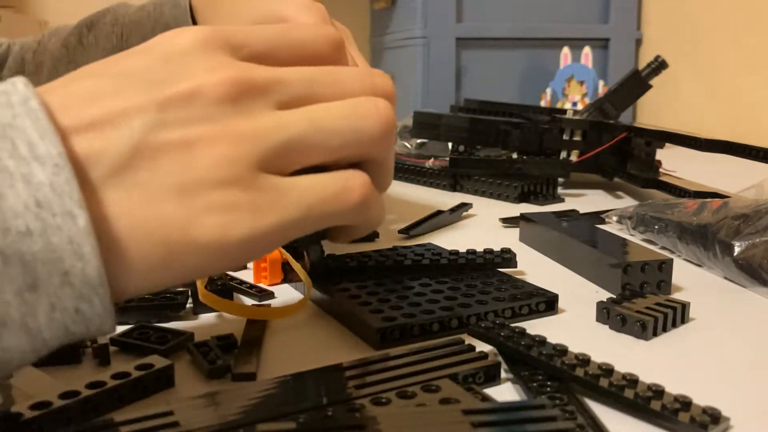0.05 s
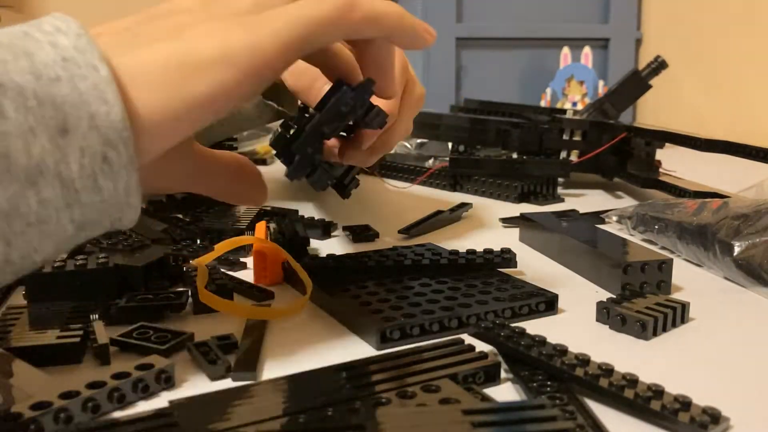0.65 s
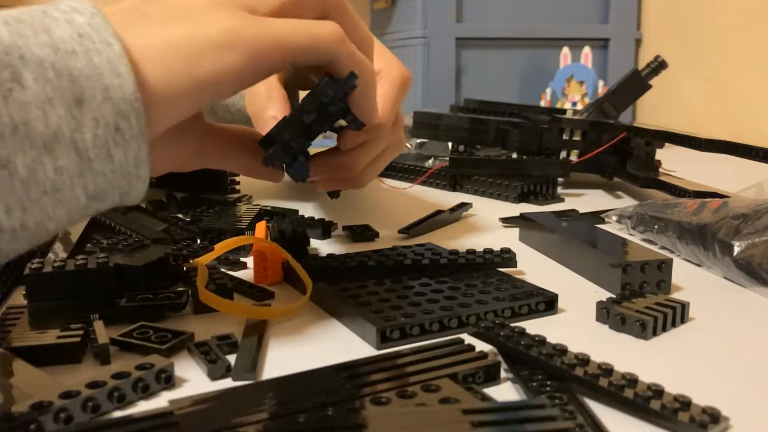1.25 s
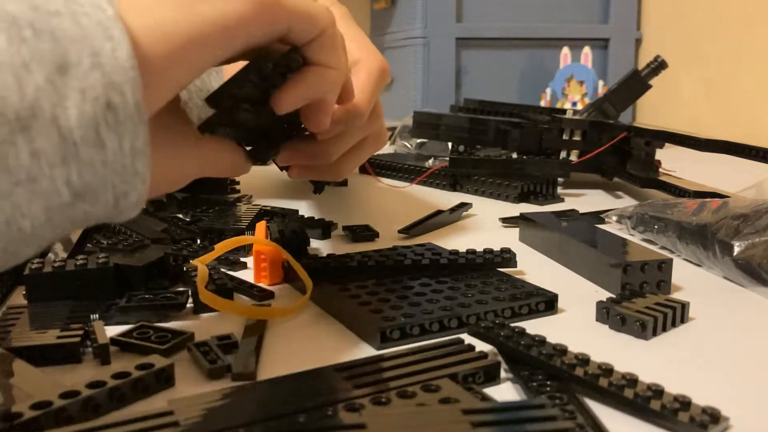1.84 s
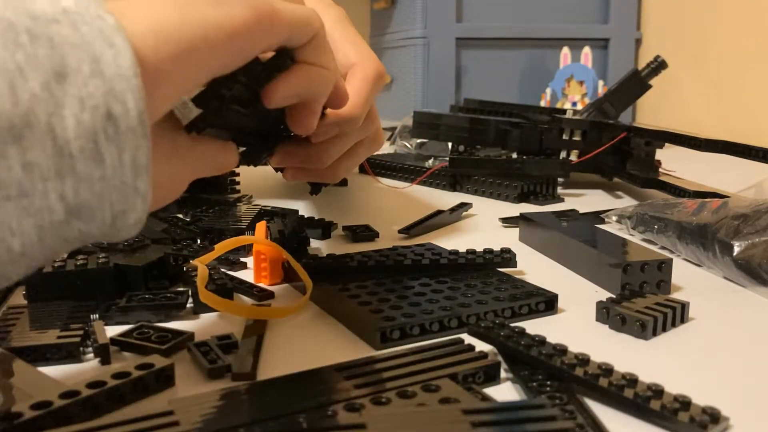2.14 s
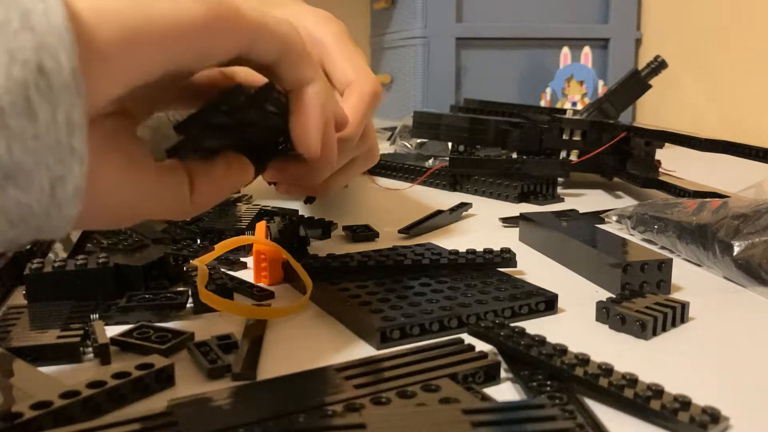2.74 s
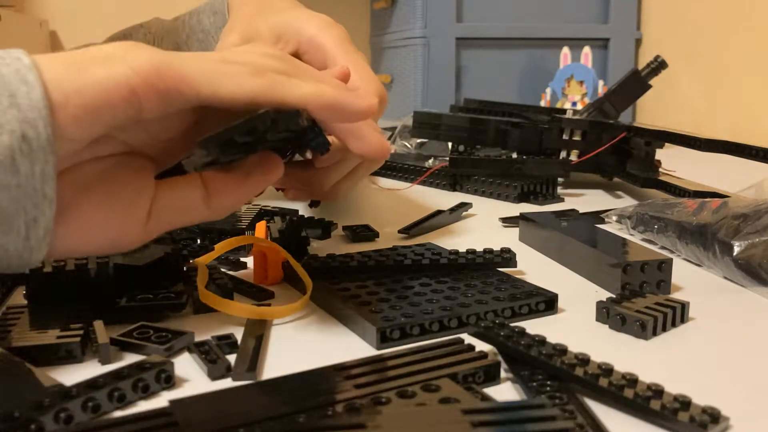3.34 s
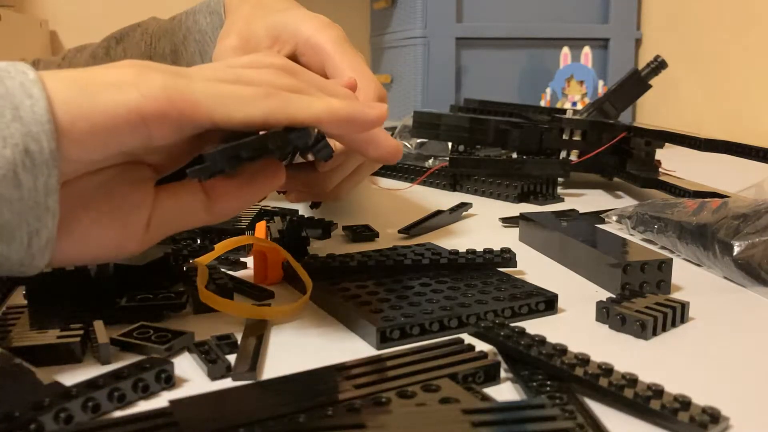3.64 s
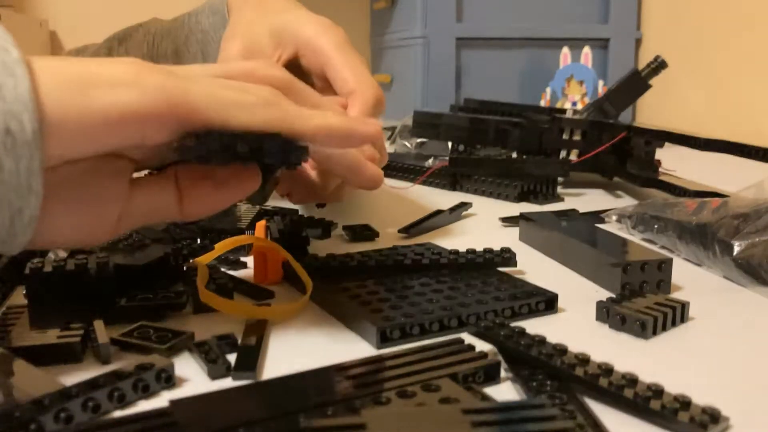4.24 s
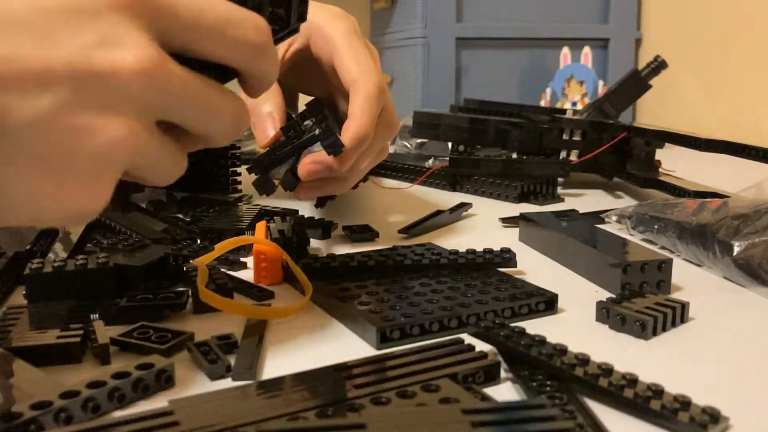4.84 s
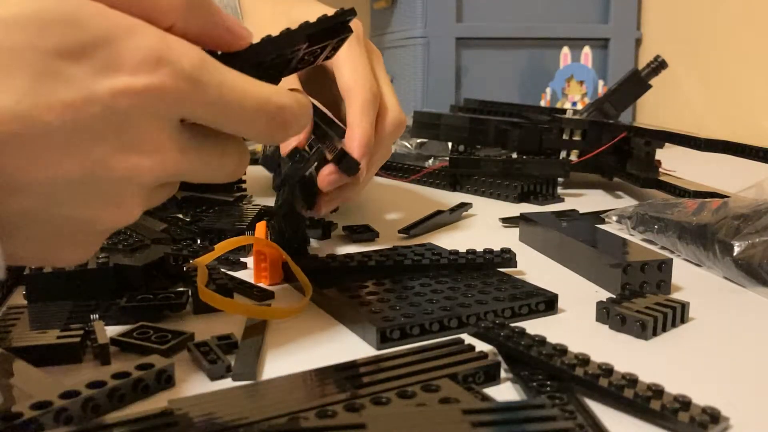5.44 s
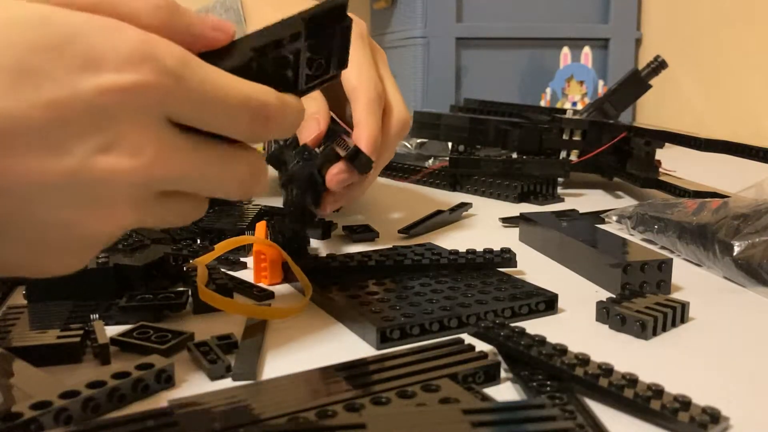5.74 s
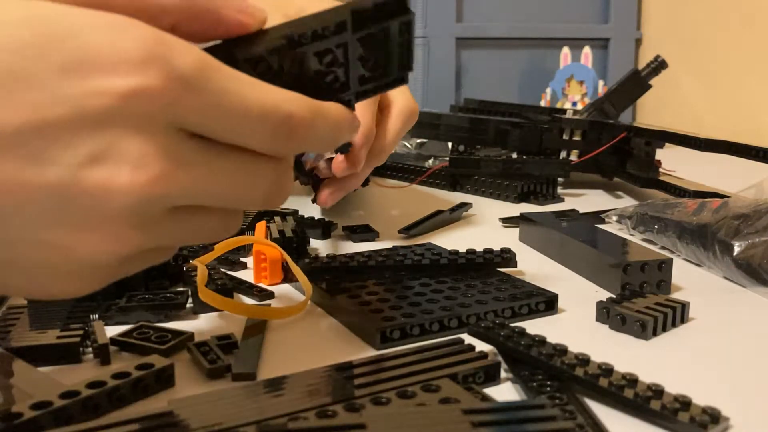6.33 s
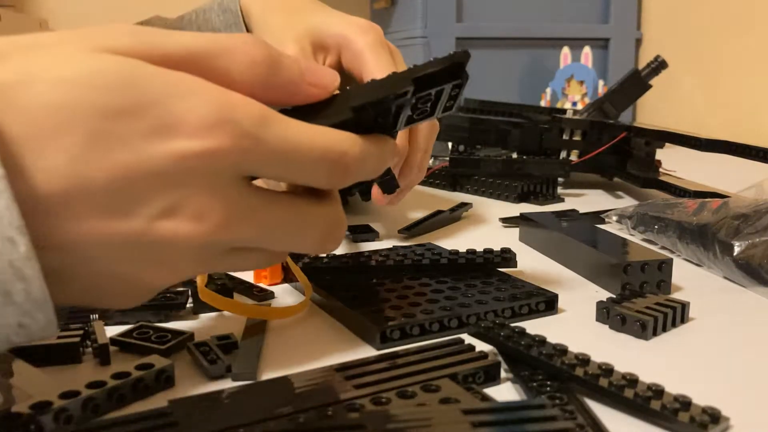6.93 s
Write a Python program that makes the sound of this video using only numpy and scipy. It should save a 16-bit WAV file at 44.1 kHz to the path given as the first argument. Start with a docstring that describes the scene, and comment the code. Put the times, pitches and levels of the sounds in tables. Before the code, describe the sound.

Hollow plastic building bricks are handled over a desk, close to the microphone in a small, quiet room. For the first two seconds they click and knock irregularly, with a sharper clack at about 0.6 seconds, while fingers slide, a sleeve rustles and the desk bumps softly. At about 2.2 seconds two plates start to be prised apart with a quick run of thin, bright ticks. After a pause, the ticking returns from 3.2 seconds as an uneven creak. At 4.1 seconds the pieces let go with one loud, sharp snap, followed at once by low thuds of hands on the desk and a few quick clicks. Lighter clicks come around 4.7 seconds. From about 5.1 to 5.8 seconds there are soft scrapes, very faint squeaks and dull bumps. A few more brief scrapes and soft bumps follow near 6.4 and 6.7 seconds.

```python
"""Small plastic bricks are handled over a desk in a small room, close to a phone's two microphones.
At first the hollow bricks click and knock, while fingers slide, a sleeve rustles and the desk thuds.
From 2.2 s two plates are prised apart: by stick-slip friction their studs tick, pause, then creak.
At 4.1 s the last stud lets go with a loud snap, and the dropping hands excite the desk's low modes.
A few clicks, scrapes, faint squeaks and soft bumps follow."""
import sys
import numpy as np
from scipy import signal
from scipy.fft import rfft, irfft, next_fast_len
from scipy.io import wavfile
from scipy.ndimage import map_coordinates

SR = 44100
rng = np.random.default_rng(int(sys.argv[2]) if len(sys.argv) > 2 else 0)


def int16_out(signal):
    """Quantize to a 16-bit WAV file."""
    q = np.round(np.clip(np.atleast_2d(signal).T, -1, 1) * 32767)
    wavfile.write(sys.argv[1], SR, q.astype(np.int16))


N = 316638
TIME = np.arange(N) / SR
USUAL_DB = -35  # reference strength of a contact; all tabulated levels are relative

# reverberation time of the room: f/Hz, t60/s
ROOM_DECAY = [(100, 0.28), (500, 0.28), (2000, 0.19), (6000, 0.33), (15000, 0.28)]
# likeness of left and right in a diffuse field: f/Hz, coherence (0-1)
COHERENCE = [(100, 1), (300, 0.8), (700, 0.09), (3000, 0.23), (5000, 0.067), (8000, 0.66)]
# phase by which the left microphone leads: f/Hz, phase/rad
PHASE_LEAD = [(0, 0), (1000, .3), (2000, -.3), (3000, -1.4), (4300, -.8), (5000, -1.7), (6000, -3.1),
              (6800, -2.4), (9800, 3.14), (13100, 9.42), (16500, 15.3)]
# spectra of reverberation, room air, resting arms, sliding skin and cloth: f/Hz, level/dB
ROOM_SPECTRUM = [(60, 1.5), (250, -2), (1500, 3), (4000, 1), (7000, -2), (15000, -11)]
AIR_SPECTRUM = [(20, -10.5), (60, -4.5), (120, -17), (250, -13), (600, -18.5), (2000, -23), (6000, -32),
                (8000, -29), (15000, -32), (16500, -36)]
ARM_SPECTRUM = [(20, -39), (35, -20.5), (50, -4), (70, 3.5), (115, 0.5), (180, -11), (350, -15.5),
                (800, -34.5), (2000, -75.5)]
SKIN_SPECTRUM = [(600, -15), (2500, -18), (4400, 0.5), (6000, -9), (8000, 2), (12000, 3), (15000, 3.5),
                 (16500, -6.5)]
CLOTH_SPECTRUM = [(60, -5), (130, 10), (300, 3), (600, -2), (1000, -12.5), (2000, -6.5), (4000, -10.5),
                  (8000, -6), (15000, -8)]
# spectra of slipping plastic and of a struck shell: f/Hz, level/dB
SNAP_SPECTRUM = [(1500, -36.5), (3000, -16), (5500, -5), (7600, -2.5), (10500, -1), (14500, -2),
                 (16500, -12)]
SHELL_SPECTRUM = [(250, -17.5), (600, -1), (1500, -4.5), (2500, 0.5), (4000, -5), (6500, -8.5),
                  (12000, -44.5)]
# resonances of a scrape and of a stud: f/Hz, bandwidth/Hz, level/dB
SCRAPE_PEAKS = [(1530, 2200, -4), (3040, 210, 5), (7700, 1500, -38)]
STUD_PEAKS = [(4250, 1300, -3), (7530, 220, -2), (10550, 830, -10.5), (14000, 370, -4)]
# modes of the desk top and of a hollow brick: f/Hz, level/dB, t60/s
DESK_MODES = [(55, -4.5, 0.69), (64, -8, 0.7), (88.7, -1.5, 0.34), (106.2, 5, 0.23), (127, 7.5, 0.11),
              (156, 2, 0.13), (234, -3, 0.21), (251.4, -4, 0.16), (294, -7, 0.22), (345.4, -3.5, 0.091),
              (438, -11, 0.052), (656, -12, .06), (780, -9, 0.028), (930, -9, 0.052)]
BRICK_MODES = [(738, -4, 0.017), (990, -4.5, 0.022), (1080, -6.5, 0.03), (1350, -3, 0.02), (1394, -1, 0.04),
               (1700, 6, .025), (1864, 1.5, 0.036), (2430, -4, 0.023), (2850, -1.5, .02),
               (3025, -3.5, 0.054), (4130, -13.5, .02)]
# modes of the hollow assembly: ratio to the main ring, level/dB, t60/s
ASSEMBLY_MODES = [(0.798, -7, .025), (.9, 0.5, .025), (1.018, 4.5, .022), (1.12, -1, .025),
                  (1.9, -10.5, 0.046), (2.039, -11, 0.025), (2.16, -8, .035)]
# fingertips sliding on plastic: t/s, level/dB, duration/s
FINGER_SLIDES = [(1.036, -67.5, 0.094), (2.325, -66.5, 0.059), (2.616, -71, 0.062), (2.964, -78.5, 0.2),
                 (4.248, -48, 0.057), (4.583, -64.5, 0.077), (4.713, -69.5, 0.24), (5.813, -69.5, 0.1),
                 (6.905, -76.5, 0.079)]
# sleeve and held parts scraping the desk: strongest pull t/s, level/dB, duration/s, cutoff f/Hz
DESK_SCRAPES = [(0.005, -61.5, 0.046, 3500), (0.29, -62, 0.077, 1600), (0.407, -66.5, 0.11, 1400),
                (0.81, -66.5, .055, 4530), (1.023, -64.5, 0.085, 1620), (1.63, -68.5, 0.054, 8100),
                (2.674, -66, 0.069, 2920), (5.127, -72.5, 0.21, 700), (5.336, -69, 0.033, 3230),
                (5.402, -66, 0.04, 3040), (5.47, -61, 0.25, 728), (5.476, -64, 0.1, 2930),
                (5.586, -58.5, 0.036, 5770), (5.802, -68.5, 0.084, 3500), (6.38, -65.5, 0.042, 3674),
                (6.664, -56, 0.021, 3980), (6.716, -61.5, 0.04, 3800)]
# plastic singing under a rub: t/s, duration/s, f/Hz, level/dB, waver as a share of f
RUB_SQUEAKS = [(0.407, 0.11, 1805, -59.5, 0.012), (5.415, 0.25, 7940, -76.5, 0.061),
               (5.438, 0.079, 3050, -73, 0.025)]
# soft blows of hands and forearms on the desk: t/s, level/dB, centre of the push f/Hz
DESK_BUMPS = [(0.172, -46.5, 313), (0.252, -36, 400), (0.372, -44, 546), (0.498, -41, 294),
              (0.533, -37.5, 380), (1.02, -50.5, 160), (1.177, -31.5, 193), (1.843, -43.5, 162),
              (2.121, -41.5, 219), (2.256, -48.5, 163), (3.108, -37, 141), (4.014, -36, 125),
              (4.109, -21, 480.7), (4.129, -12.5, 231), (4.140, -14.5, 131), (4.161, -12.5, 80.6),
              (4.23, -17.5, 147), (4.285, -28, 96), (4.372, -31.5, 130), (5.118, -38, 122),
              (5.355, -35, 113), (5.399, -30, 129.8), (5.454, -26.5, 100), (6.02, -45, 82.6),
              (6.396, -43, 129), (6.738, -34.5, 196), (6.764, -32.5, 110)]
# knocks on the assembly: t/s, level/dB, main ring f/Hz (lower for a larger piece)
ASSEMBLY_KNOCKS = [(0.252, -44, 1510), (0.531, -51.5, 1680), (0.632, -33, 1620), (0.641, -39, 1653),
                   (4.1075, -23, 1456), (4.225, -41.5, 1870)]
# bricks meeting in the fingers: t/s, snap level/dB, shell level/dB, cover by the hand (0-1)
BRICK_CLICKS = [(0.205, -58, -65.5, 0.75), (0.251, -57, -43.5, 0.3), (0.372, -75, -57, 0.3),
                (0.487, -44.5, -54, 0.55), (0.532, -55, -55, 0.8), (0.631, -32.5, -34.5, 0.84),
                (0.793, -48, -47, 0.9), (0.832, -57, -48, 0), (0.999, -53, -54, 0.6),
                (1.258, -47.5, -54.5, 0.95), (1.403, -58, -58, 0.7), (1.531, -42.5, -53, 0.74),
                (1.547, -39, -50, .6), (1.611, -35.5, -48.5, 0.81), (1.831, -45, -52.5, 1),
                (1.904, -47, -52.5, 0.06), (2.119, -48, -53, 0.37), (3.098, -51, -50, 0),
                (4.107, -16.5, -17.5, .3), (4.186, -29.5, -33.5, 0.3), (4.224, -37, -33.5, 0.52),
                (4.264, -35, -35, 0), (4.678, -46.5, -49, 0), (4.703, -41, -49, 0), (4.769, -50, -55.5, 0)]
# studs slipping in their sockets, the last one letting go: t/s, level/dB, resonance f/Hz
STUD_SLIPS = [(2.17, -44.5, 8200), (2.193, -39, 10600), (2.208, -33, 15100), (2.242, -37.5, 14300),
              (2.27, -33.5, 11700), (2.289, -30, 8260), (2.313, -37, 8700), (2.362, -40, 8040),
              (3.199, -44, 8200), (3.221, -39.5, 7800), (3.242, -37.5, 12400), (3.25, -38, 8700),
              (3.298, -30, 5850), (3.34, -35.5, 10700), (3.354, -35, 7800), (3.424, -40, 8050),
              (3.436, -33, 14300), (3.51, -42.5, 8550), (3.524, -41, 8500), (3.537, -35, 7550),
              (3.542, -40, 14700), (3.594, -43, 7750), (3.606, -35.5, 7540), (3.625, -40.5, 7800),
              (3.69, -33, 7760), (3.709, -39, 7600), (3.785, -33.5, 7750), (3.804, -29.5, 7600),
              (3.892, -31, 14200), (3.944, -36, 11700), (4.027, -29.5, 11500), (4.054, -40, 11300),
              (4.073, -31, 7600), (4.096, -30.5, 7600), (4.104, -12.5, 11300)]


def amp(db):
    """Amplitude ratio of a level in decibels."""
    return 10 ** (np.asarray(db) / 20)


def unit_rms(x):
    """Power normalisation to rms 1."""
    return x / np.sqrt(np.mean(x ** 2) + 1e-20)


def unit_energy(x):
    """Energy normalisation to one millisecond at rms 1."""
    return x * np.sqrt(SR / 1000 / (np.sum(x ** 2) + 1e-20))


def along(points, hz):
    """Interpolation of (f/Hz, value) points on a logarithmic frequency axis."""
    f, values = np.transpose(points)
    return np.interp(np.log(hz + 1), np.log(f + 1), values)


def wobble(rate):
    """Random modulation: a spline through `rate` knots a second."""
    return map_coordinates(rng.standard_normal(int(N * rate / SR) + 4), [TIME * rate])


def add(track, s, x):
    """Superposition of x on the track at time s."""
    part = track[..., max(round(s * SR), 0):][..., :x.shape[-1]]
    part += x[..., :part.shape[-1]]


def noise(spectrum, size, resonances=()):
    """Random-phase noise of rms 1: a broad spectrum with Lorentzian resonance peaks."""
    hz = np.fft.rfftfreq(size, 1 / SR)
    peaks = 1 + sum(amp(db) / (1 + ((hz - f) / (width / 2)) ** 2) for f, width, db in resonances)
    phases = np.exp(2j * np.pi * rng.random(len(hz)))
    return unit_rms(irfft(amp(along(spectrum, hz)) * peaks * phases, size))


def ringing(modes, t, scatter_db):
    """Free vibration: a sum of damped modes, excited at new strengths each time."""
    hz, db, t60 = np.transpose(modes)[:, :, None]
    decays = amp(db + scatter_db * rng.standard_normal(hz.shape) - 60 * t / t60)
    sines = np.sin(2 * np.pi * (hz * t + rng.random(hz.shape)))
    return unit_energy(np.sum(decays * sines, axis=0))


def diffuse(spectrum, size):
    """Diffuse field: noise from all sides is only partly coherent at two points."""
    padded = next_fast_len(size, True)
    angle = np.arccos(np.clip(along(COHERENCE, np.fft.rfftfreq(padded, 1 / SR)), 0, 1)) / 2
    pair = rfft([noise(spectrum, padded), noise(spectrum, padded)])
    mid, side = irfft(pair * [np.cos(angle), np.sin(angle)], padded)[:, :size]
    return np.array([mid + side, mid - side])


def room(x, build_s=0.0032):
    """Reverberation: convolution with an exponentially decaying tail, different for every spot."""
    hz, t, bands = signal.stft(diffuse(ROOM_SPECTRUM, size=16384), SR, nperseg=256)
    envelope = amp(-60 * t / along(ROOM_DECAY, hz)[:, None]) * (1 - np.exp(-t / build_s))
    tail = signal.istft(bands * envelope, SR, nperseg=256)[1]
    return signal.fftconvolve(x[None], tail / np.linalg.norm(tail[0]), axes=1)


def add_in_room(track, s, x, room_db):
    """Superposition of direct and reverberant sound at time s."""
    add(track, s, x)
    add(track, s, amp(room_db) * room(x))


def room_air(level_db=-76):
    """Ambient noise: a steady, quiet diffuse field."""
    return amp(level_db) * diffuse(AIR_SPECTRUM, N)


def forearms(rest_db=-73, settle_db=-62, settle_growth=0.28, settle_s=0.054, drag_s=0.043, lag_s=0.017):
    """Forced vibration: resting arms make the desk rumble, more as weight shifts at bumps and scrapes."""
    swells = [(s + settle_s, settle_db + settle_growth * (db - USUAL_DB), settle_s)
              for s, db, _ in DESK_BUMPS]
    swells += [(s + lag_s, db + 1, drag_s) for s, db, _, _ in DESK_SCRAPES]
    rest_power = amp(rest_db + 1.5 * wobble(12)) ** 2
    swell_power = sum(amp(db) ** 2 * np.exp(-((TIME - s) / width) ** 2) for s, db, width in swells)
    rumble = unit_rms(diffuse(ARM_SPECTRUM, N) * amp(3 * wobble(36)))
    return np.sqrt(rest_power + swell_power) * rumble


def fingers(level_db=-1, grain_db=4):
    """Friction noise: skin sliding over the studs gives short, grainy hisses."""
    strokes = sum(amp(db) * np.exp(-(2 * (TIME - s) / length) ** 4) for s, db, length in FINGER_SLIDES)
    hiss = unit_rms(diffuse(SKIN_SPECTRUM, N) * amp(grain_db * wobble(400)))
    return amp(level_db) * strokes * hiss


def scrapes(level_db=1, grain_db=7, grain_hz=300, rise_share=0.51):
    """Sliding friction: a run of tiny catches swells and fades, brighter for a harder edge."""
    out, t = np.zeros((2, N)), np.arange(-8192, 8192) / SR
    for s, db, length, top_hz in DESK_SCRAPES:
        rise, fall = rise_share * length, (1 - rise_share) * length
        colour = [(hz, cloth_db - 10 * np.log10(1 + (hz / top_hz) ** 6))
                  for hz, cloth_db in CLOTH_SPECTRUM]
        catches = amp(grain_db * np.interp(t * grain_hz, np.arange(-200, 200), rng.standard_normal(400)))
        pull = np.exp(-np.where(t < 0, (t / rise) ** 2, np.abs(t / fall) ** 1.4))
        rub = amp(db + level_db) * pull * unit_rms(noise(colour, len(t), SCRAPE_PEAKS) * catches)
        before_zero = max(round(-(s + t[0]) * SR), 0)
        add_in_room(out, s + t[0], rub[before_zero:], room_db=-3)
    return out


def squeaks(waver_hz=270):
    """Self-excited oscillation: rubbed plastic sings briefly on one wavering note."""
    out = np.zeros((2, N))
    for start, length, pitch_hz, db, waver in RUB_SQUEAKS:
        t = np.arange(int(length * SR)) / SR
        pitch = pitch_hz * (1 + waver * wobble(waver_hz)[:len(t)])
        note = amp(db) * np.sin(np.pi * t / length) * np.sin(2 * np.pi * np.cumsum(pitch) / SR)
        add_in_room(out, start, note, room_db=-5)
    return out


def bumps(rise_cycles=1.2, octaves=0.62, push_db=-1, push_t60=0.055, nudge_db=-38.5, nudge_growth=0.64):
    """Resonance: a soft blow, or the nudge of a click, rings the desk modes near its push frequency."""
    out, t = np.zeros((2, N)), np.arange(16384) / SR
    nudges = [(s, nudge_db + nudge_growth * (shell_db - USUAL_DB), 280)  # push centred on 280 Hz
              for s, _, shell_db, _ in BRICK_CLICKS]
    for s, db, centre_hz in DESK_BUMPS + nudges:
        modes = [(hz, mode_db - 10 * np.log10(1 + (np.log2(hz / centre_hz) / octaves) ** 4), t60)
                 for hz, mode_db, t60 in DESK_MODES]
        colour = [(centre_hz / 6, -40), (centre_hz / 2, -5), (centre_hz * 1.7, 0),
                  (centre_hz * 5, -25), (centre_hz * 30, -70), (centre_hz * 100, -100)]
        push = amp(push_db) * unit_energy(noise(colour, len(t)) * amp(-60 * t / push_t60))
        onset = 1 - np.exp(-(t * centre_hz / rise_cycles) ** 2)
        thud = amp(db) * unit_energy((ringing(modes, t, scatter_db=1) + push) * onset)
        add_in_room(out, s, thud, room_db=-6)
    return out


def knocks(rise_s=0.00059):
    """Impact excitation: the hollow assembly rings in close modes, with weaker ones an octave up."""
    out, t = np.zeros((2, N)), np.arange(4096) / SR
    for s, db, main_hz in ASSEMBLY_KNOCKS:
        modes = [(ratio * main_hz, mode_db, t60) for ratio, mode_db, t60 in ASSEMBLY_MODES]
        clack = amp(db) * ringing(modes, t, scatter_db=2) * (1 - np.exp(-t / rise_s))
        add_in_room(out, s, clack, room_db=-2)
    return out


def contact(snap_db, shell_db, stud_hz, usual_slip_s, snap_room_db, shell_room_db, dull_db=0,
            hardening=0.36, tail_db=-25, tail_t60=0.066, crack_db=3, crack_t60=0.03):
    """Transient excitation: plastic slips in a bright burst; the hollow brick rings lower and longer."""
    t = np.arange(2048) / SR
    # a stronger contact is shorter and starts more sharply
    slip_s = usual_slip_s * amp(-hardening * (max(snap_db, shell_db) - USUAL_DB))
    onset = 1 - np.exp(-(t / (0.2 * slip_s)) ** 2)
    decay = amp(-60 * t / slip_s) + amp(tail_db - 60 * t / tail_t60)
    # a hand in the way takes off the top, by dull_db an octave
    colour = [(hz, db - dull_db * max(np.log2(hz / 7000), 0)) for hz, db in SNAP_SPECTRUM]
    peaks = STUD_PEAKS + [(stud_hz, 1200, 1.5)]  # each stud adds its own resonance
    brick_size = np.exp(0.07 * rng.standard_normal())
    snap = amp(snap_db) * unit_energy(noise(colour, len(t), peaks) * onset * decay)
    ring = ringing([(hz / brick_size, db, t60) for hz, db, t60 in BRICK_MODES], t, scatter_db=3)
    crack = amp(crack_db) * unit_energy(noise(SHELL_SPECTRUM, len(t)) * amp(-60 * t / crack_t60))
    shell = amp(shell_db) * unit_energy((ring + crack) * onset)
    out = room(amp(snap_room_db) * snap + amp(shell_room_db) * shell)
    add(out, 0, snap + shell * amp([[-1.5], [1.2]]))  # the shell sounds slightly to the right
    return out


def clicks(hollow_db=-2):
    """Acoustic shadowing: the more the hand covers meeting bricks, the duller and more reverberant."""
    out = np.zeros((2, N))
    for s, snap_db, shell_db, cover in BRICK_CLICKS:
        click = contact(snap_db, shell_db + hollow_db, stud_hz=rng.uniform(4000, 14000),
                        usual_slip_s=0.006, snap_room_db=-15 + 10 * cover,
                        shell_room_db=-5 + 6 * cover, dull_db=9 * cover)
        add(out, s, click)
    return out


def prising(hollow_db=-19, loosen_s=0.33, loosen_db=3.5, afterslip_s=(0.0097, 0.022), afterslip_db=-16.5):
    """Stick-slip: each stud slips, then again more weakly; the plates ring more freely near release."""
    out, release_s = np.zeros((2, N)), STUD_SLIPS[-1][0]
    for s, stud_db, stud_hz in STUD_SLIPS:
        looseness = np.clip(1 - (release_s - s) / loosen_s, 0, 1)
        for delay, drop_db in [(0, 0), (rng.uniform(*afterslip_s), afterslip_db)]:
            snap_db = stud_db + drop_db
            shell_db = snap_db + hollow_db + loosen_db * looseness
            tick = contact(snap_db, shell_db, stud_hz, usual_slip_s=0.0089,
                           snap_room_db=-12, shell_room_db=-3)
            add(out, s + delay, tick)
    return out


def scene(left_db=-0.7, right_db=2.25):
    """Superposition of all sources; the desk reaches the right microphone a little more."""
    desk = (forearms() + scrapes() + bumps() + knocks()) * amp([[left_db], [right_db]])
    return room_air() + fingers() + squeaks() + desk + clicks() + prising()


def record(dry, top_hz=16500):
    """Phase difference and band limit: the two microphones differ in phase and pass no extreme treble."""
    padded = next_fast_len(N + SR // 2, True)
    hz = np.fft.rfftfreq(padded, 1 / SR)
    lead = np.interp(hz, *np.transpose(PHASE_LEAD))
    phase_shift = np.exp(0.5j * np.array([lead, -lead]))
    low_pass = 1 / (1 + (hz / top_hz) ** 120)
    return irfft(rfft(dry, padded) * phase_shift * low_pass, padded)[:, :N]


dry = scene()
out = record(dry)
int16_out(out)
```